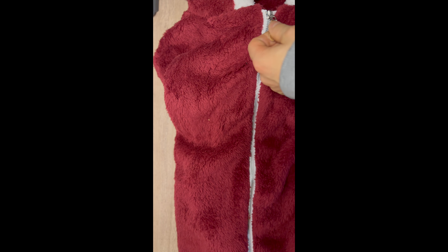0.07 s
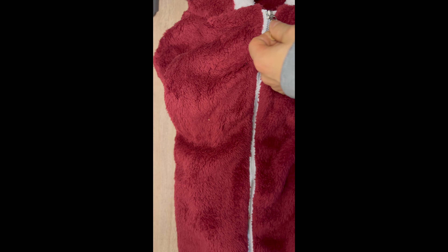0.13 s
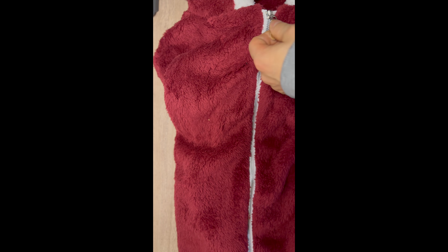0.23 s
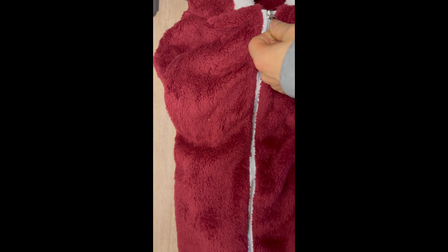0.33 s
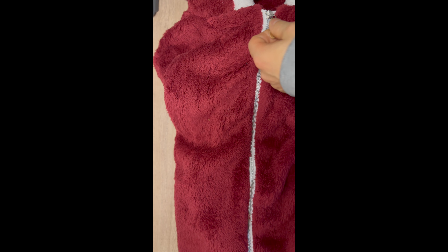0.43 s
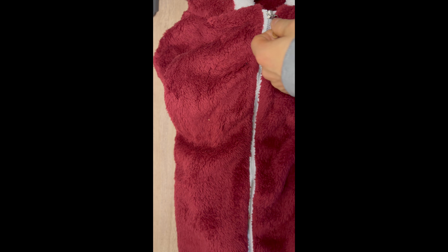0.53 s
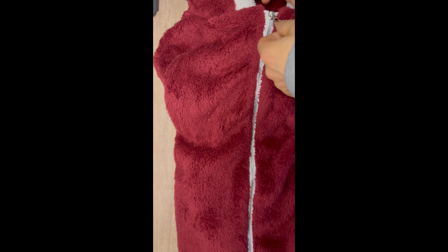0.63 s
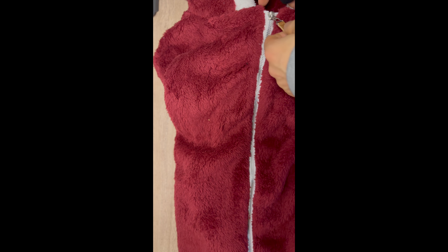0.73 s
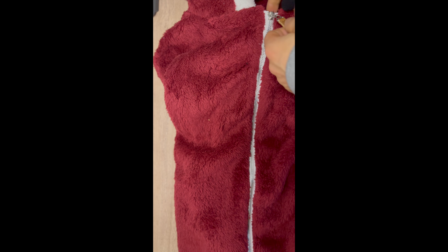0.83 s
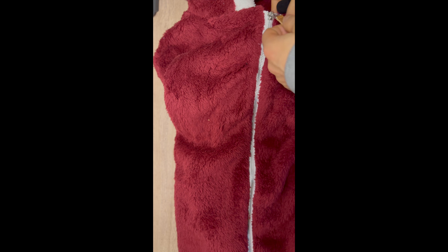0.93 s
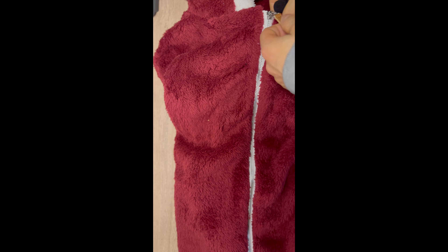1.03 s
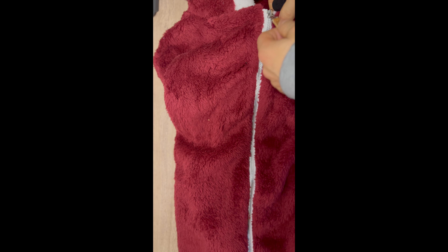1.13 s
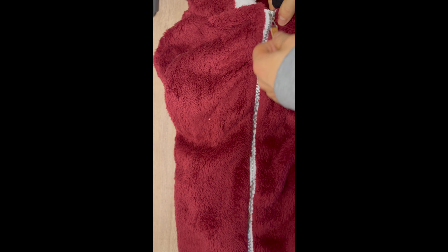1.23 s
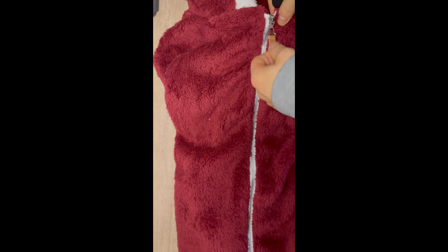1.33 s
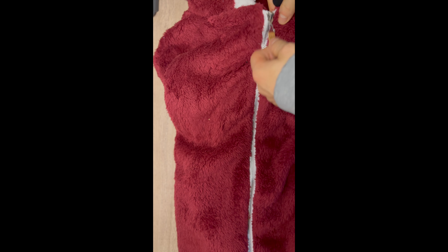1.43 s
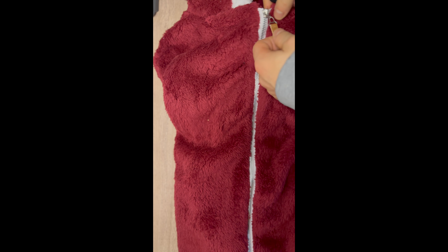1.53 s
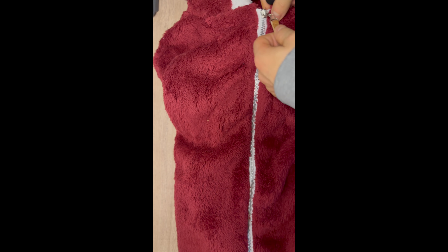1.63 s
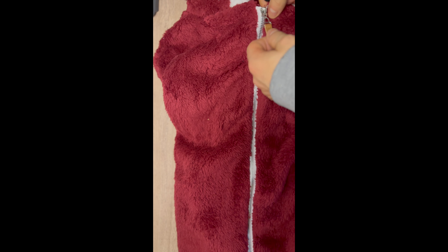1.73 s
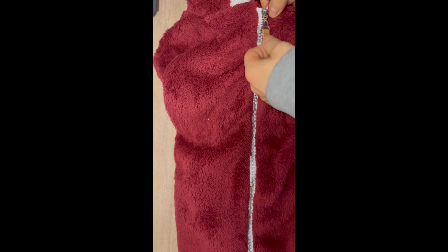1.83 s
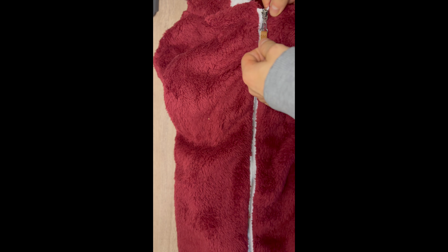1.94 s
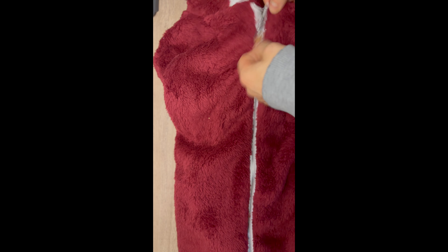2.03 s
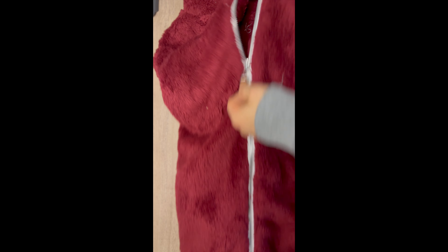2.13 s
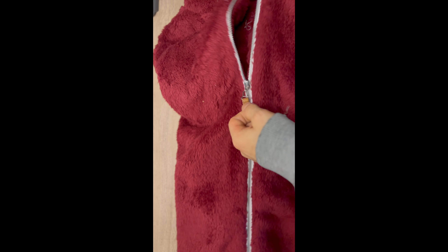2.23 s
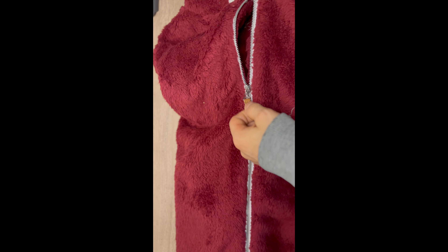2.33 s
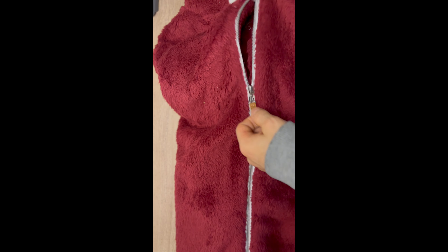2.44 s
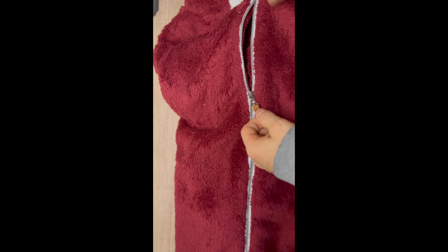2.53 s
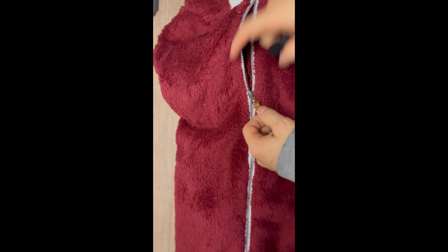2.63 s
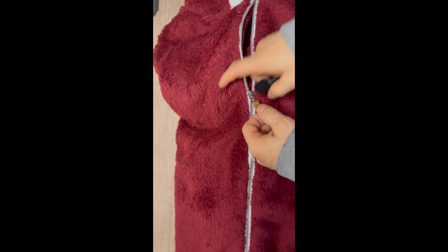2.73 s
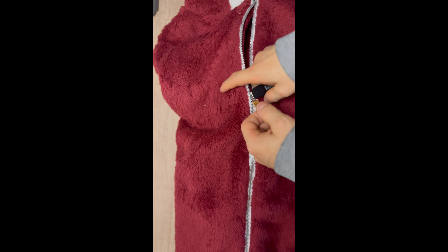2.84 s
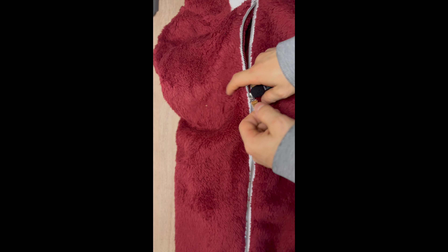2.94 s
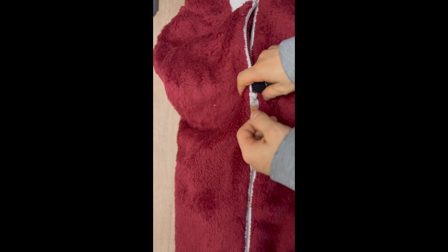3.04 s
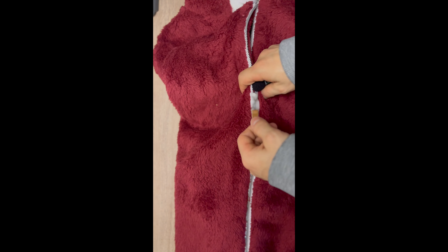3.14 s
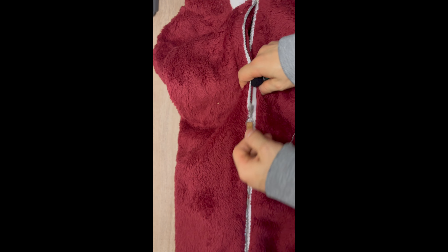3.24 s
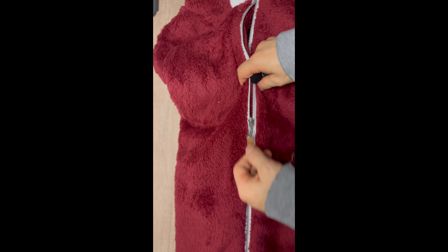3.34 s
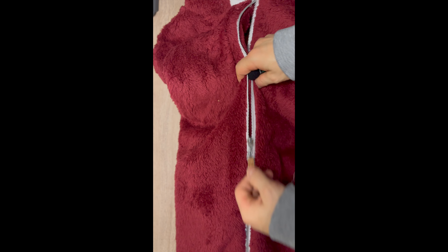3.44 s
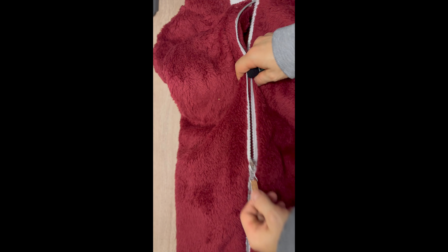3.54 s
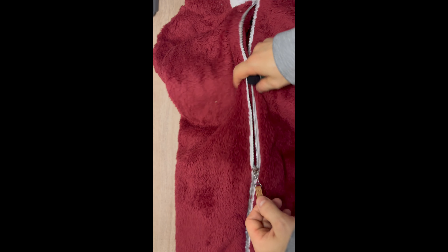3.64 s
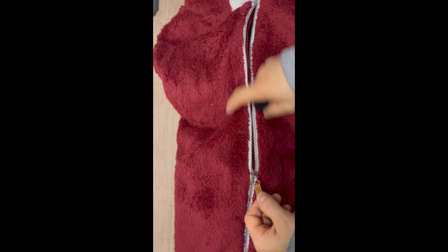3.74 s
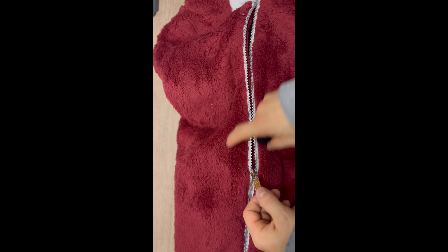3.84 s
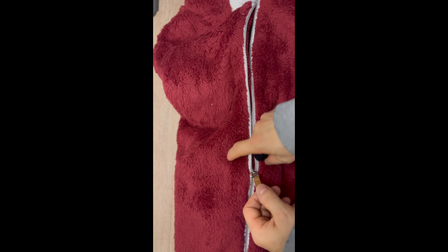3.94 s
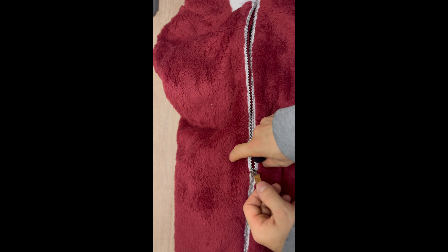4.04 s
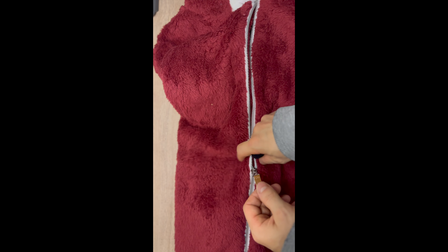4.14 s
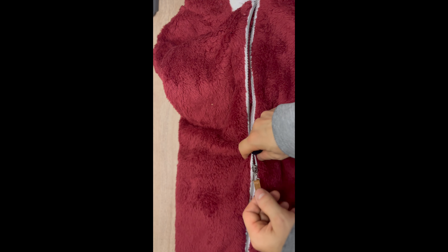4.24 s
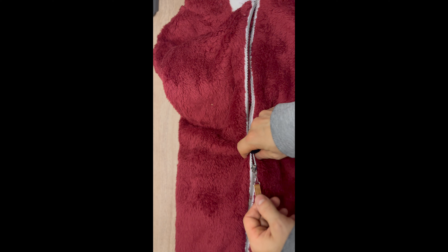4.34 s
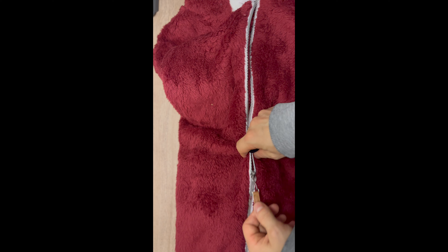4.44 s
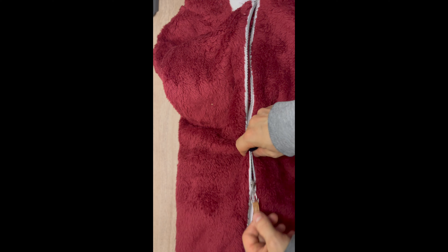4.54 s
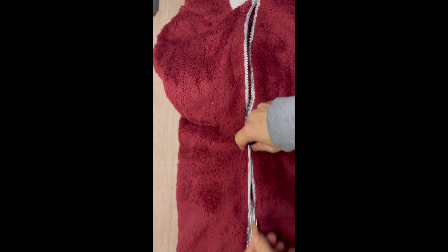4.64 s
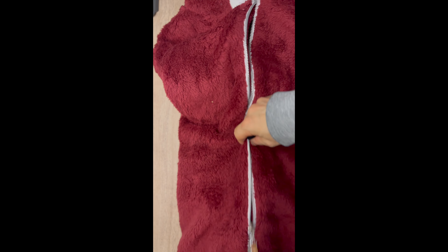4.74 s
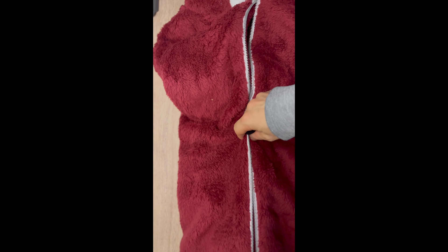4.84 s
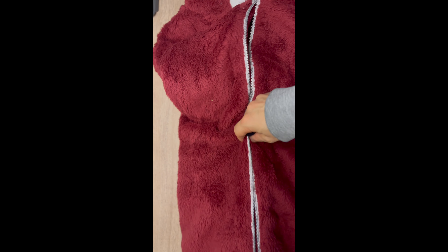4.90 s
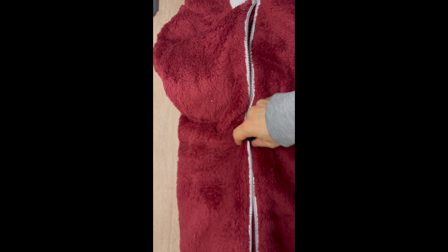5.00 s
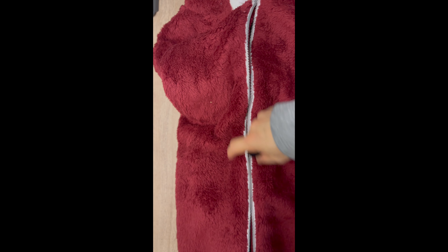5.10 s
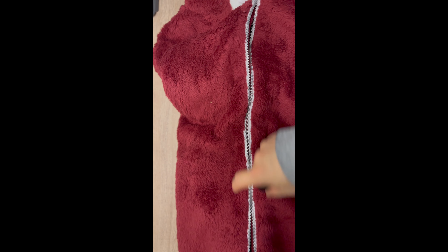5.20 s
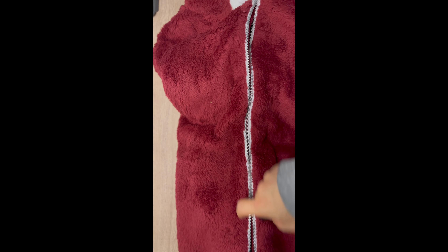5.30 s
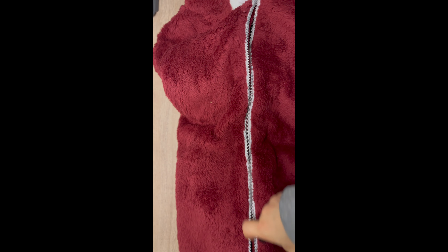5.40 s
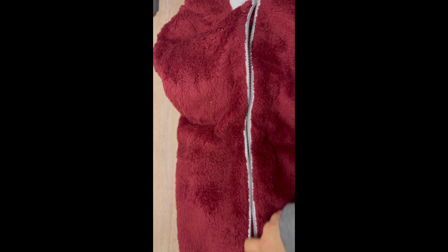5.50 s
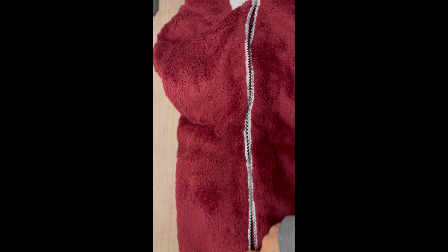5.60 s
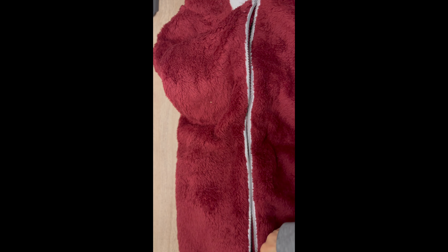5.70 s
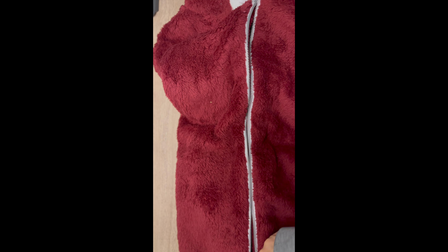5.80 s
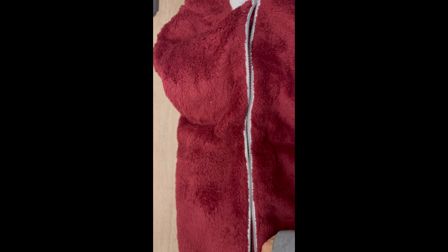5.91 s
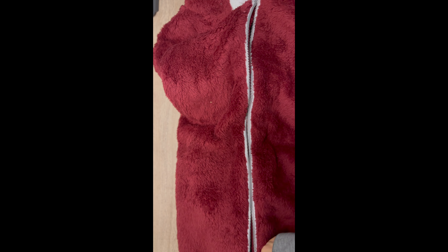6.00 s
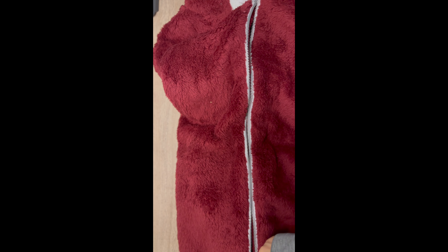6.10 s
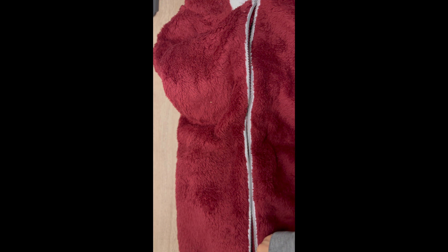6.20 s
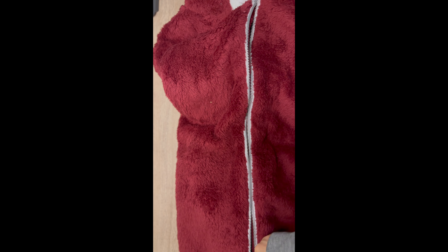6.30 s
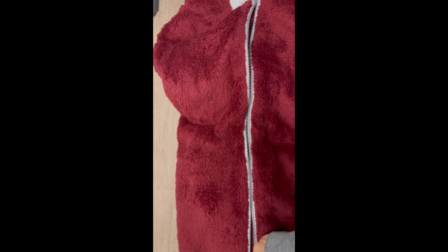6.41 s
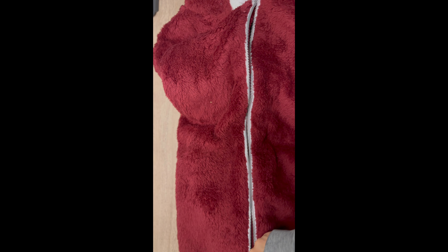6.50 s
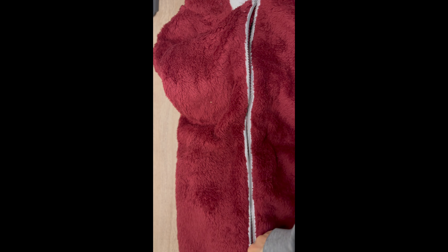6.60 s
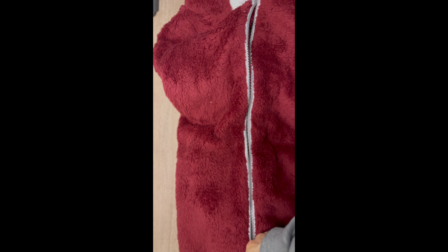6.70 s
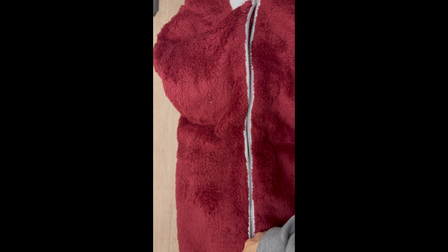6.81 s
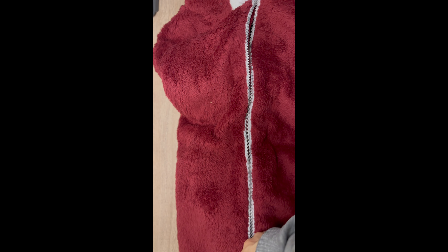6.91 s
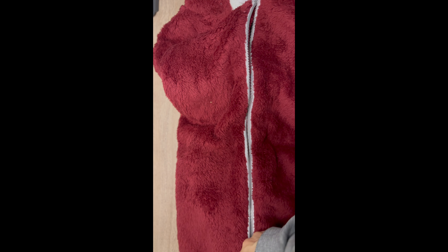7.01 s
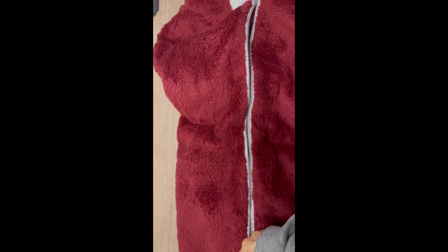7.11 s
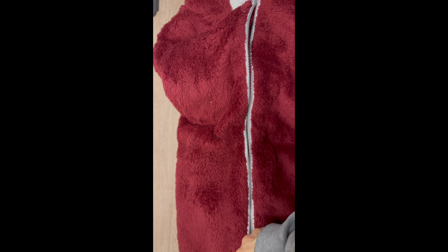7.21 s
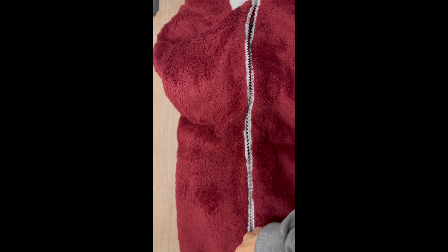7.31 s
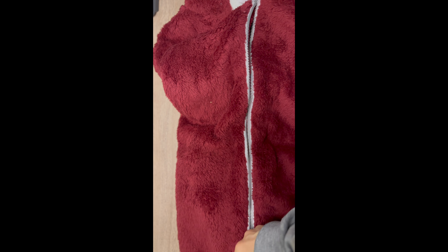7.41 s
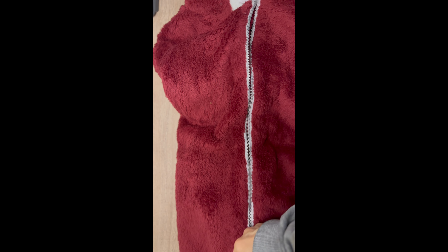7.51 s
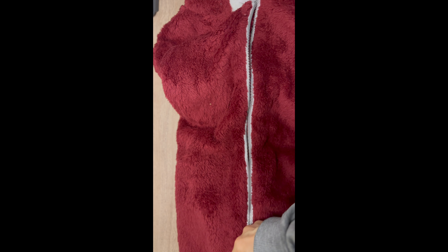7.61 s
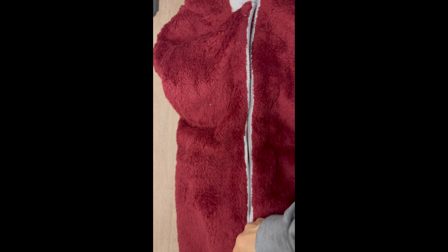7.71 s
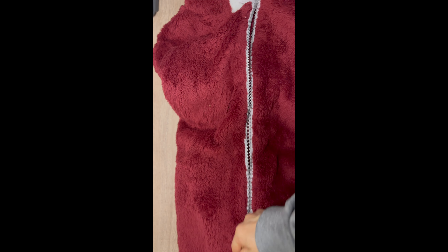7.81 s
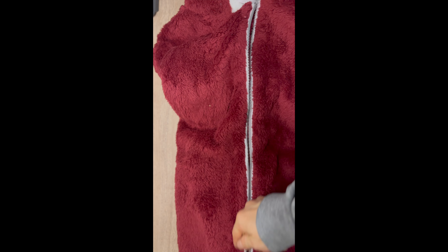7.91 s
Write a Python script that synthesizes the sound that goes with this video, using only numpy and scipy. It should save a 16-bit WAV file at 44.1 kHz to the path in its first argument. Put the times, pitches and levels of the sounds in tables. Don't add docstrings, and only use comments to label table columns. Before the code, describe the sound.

Hands brush and scuff plush fleece while a zipper buzzes down in short bursts, snapping and knocking, then begins a faint pull back.

```python
import sys
import numpy as np
from scipy import signal
from scipy.fft import rfft, irfft, next_fast_len
from scipy.io import wavfile
from scipy.ndimage import uniform_filter1d, map_coordinates

SR = 44100
rng = np.random.default_rng(int(sys.argv[2]) if len(sys.argv) > 2 else 0)


def generate_wav(signal):
    frames = np.transpose(np.atleast_2d(signal))
    scaled = np.clip(frames, -1, 1) * 32767
    pcm = np.round(scaled).astype(np.int16)
    wavfile.write(sys.argv[1], SR, pcm)


def amplitude_ratio(level_db):
    exponent = np.asarray(level_db, float) / 20
    return 10 ** exponent


N = 350683


def unit(x):
    return x / np.sqrt(np.mean(x ** 2) + 1e-20)


def steady(x):
    return x / np.sqrt(np.abs(uniform_filter1d(x ** 2, size=2000)) + 1e-9)


def curves(rows):
    s, *columns = np.transpose(rows)
    return [np.interp(np.arange(N) / SR, s, column) for column in columns]


def wobble(rate):
    knots = rng.standard_normal(int(N * rate / SR) + 4)
    return map_coordinates(knots, [np.arange(N) * rate / SR])


def filtered(x, response):
    m = next_fast_len(N + SR // 2)
    return irfft(rfft(x, m) * response(np.fft.rfftfreq(m, 1 / SR)), m)[:N]


def hiss(spectrum):
    f, level = np.transpose(spectrum)
    colour = lambda hz: amplitude_ratio(np.interp(np.log(hz + 1), np.log(f), level))
    return unit(filtered(rng.standard_normal(N), colour))


def patchy(spectrum, patchy_db):
    z = signal.stft(hiss(spectrum), nperseg=512)[2]
    field = uniform_filter1d(rng.standard_normal(z.shape), size=6, axis=0)
    field = uniform_filter1d(field, size=24, axis=1)
    return signal.istft(z * amplitude_ratio(patchy_db * unit(field)), nperseg=512)[1][:N]


def resonant(x, modes):
    def response(f):
        return sum((-1) ** k * amplitude_ratio(db) * 1j * f * width / (centre ** 2 - f * f + 1j * f * width)
                   for k, (centre, width, db) in enumerate(modes))
    return filtered(x, response)


# (start [s], hold [s], level [dB], brightness [dB], weight on capsule [dB])
SLOW_BRUSHES = [(0, 0.041, -35.5, 5, -2), (.83, .04, -50.5, 5, 9), (.47, 0.046, -42.5, 4, 9),
                (.68, 0.023, -49.5, 5, 20), (.89, 0.043, -36.5, 5, 4.5), (1.0, 0.16, -39, 3.5, 3),
                (1.1, 0.045, -49, -5.5, 26), (1.28, 0.55, -46, 1.5, 10.5), (1.74, 0.02, -52.5, 9, -9),
                (2.13, 0.085, -31.5, 9.5, 6), (2.31, 0.056, -42, -4.5, 1), (2.63, 0.068, -41, 1.5, -1),
                (2.79, 0.18, -51.5, 0, -14), (2.95, 0.15, -39, -3, 5), (3.115, 0.037, -29.5, -1, 0.5),
                (3.25, 0.36, -26.5, -0.5, 5.5), (4.11, 0.12, -45, -3, 19), (4.23, .2, -43, -7, 0),
                (4.6, 0.21, -26.5, -5, 4.5), (5.0, 0.1, -39.5, -2.5, -18), (6.05, 0.18, -31.5, -2.5, 1.5),
                (6.31, 0.12, -39.5, 0.5, -3.5), (6.52, 0.075, -37, 4.5, -21), (6.88, 0.033, -45, -9.5, -2)]
QUICK_SCUFFS = [(.225, 0.014, -48, 7.5, 14.5), (.298, 0.0077, -34.5, 15.5, 11), (.36, 0.081, -27, 9.5, 7),
                (1.79, 0.022, -34, -10.5, -8), (1.927, 0.014, -34.5, 0.5, 0), (1.988, 0.012, -35.5, -5, -3),
                (2.111, 0.025, -25, 11.5, 14.5), (2.49, 0.057, -34, 0.5, -1),
                (2.872, 0.065, -34.5, 3.5, 15), (3.7, 0.063, -28, -5.5, -15), (3.865, 0.048, -47, -10, 8),
                (4.0, 0.092, -57, -8, 35), (4.45, 0.22, -24, -1.5, 5.5), (5.2, 0.042, -48, -2.5, 11),
                (5.37, 0.051, -43, 9, 10.5), (5.43, 0.054, -36, 15, 14), (5.5, 0.037, -38, 2, 10),
                (5.62, 0.018, -37.5, 4.5, 13), (5.805, 0.029, -34.5, 7, 12),
                (5.875, 0.0081, -21.5, 7, -1.5), (5.92, 0.063, -26.5, -3.5, 5.5), (.333, .022, -40, 8, 8),
                (.128, 0.029, -40.5, 0.5, -10), (7.57, 0.062, -33.5, 2, -4), (7.72, .25, -32.5, 1, 16.5)]
SWELLING_DRAGS = [(1.59, 0.074, -37, 2.5, -2), (0.623, 0.013, -43, 3.5, 9.5), (1.26, 0.019, -48.5, 6, 12),
                  (0.755, 0.038, -60, -5, 32.5), (2.42, 0.081, -58, -2, 1), (4.3, 0.034, -36.5, 0.5, 20),
                  (5.1, 0.025, -44.5, -39.5, 2), (5.29, 0.049, -52.5, -4.5, 3),
                  (6.11, 0.028, -35, -23, 11.5), (6.64, 0.047, -51, 4, -2), (6.8, 0.062, -60, 6.5, 8),
                  (7.03, 0.081, -35, -2, -4), (7.49, 0.04, -59.5, 12, 7), (4.7, 0.047, -42, -16, 14)]
HANDS_AT_REST = [-70.5, -72, -63, -55]


def hands():
    time = np.arange(0, N, 32) / SR
    fuzz_rest_db = -100
    power = amplitude_ratio(2 * np.array([*HANDS_AT_REST, fuzz_rest_db]))[:, None]
    kinds = (SLOW_BRUSHES, 630, 320), (QUICK_SCUFFS, 3300, 1440), (SWELLING_DRAGS, 580, 960)
    for moves, rise, fall in kinds:
        s, hold, db, bright, weight = np.transpose(moves)[..., None]
        edge_db = -rise * np.maximum(s - time, 0) - fall * np.maximum(time - s - hold, 0)
        cloth_db = -3 + 0.4 * weight - 0.54 * bright + edge_db
        thump_db = weight + 0.62 * edge_db
        fuzz_db = -14.5 + 1.46 * bright + edge_db
        layers = [bright + edge_db, edge_db, cloth_db, thump_db, fuzz_db]
        power = power + amplitude_ratio(2 * (db + np.array(layers))).sum(axis=1)
    return [np.interp(np.arange(N) / SR, time, 10 * np.log10(p)) for p in power]


# (frequency [Hz], level [dB per Hz])
PILE_COLOUR = [(1470, -51), (2500, -25), (3460, -4.5), (5270, -11.5), (7650, -6), (8530, -18.5),
               (10200, -31.5), (16000, -79)]
WEAVE_COLOUR = [(550, -21.5), (850, 3.5), (1300, 1), (1790, 3.5), (2300, -0.5), (3000, -3.5), (4500, -40),
                (9000, -86)]
CLOTH_COLOUR = [(100, -10), (200, 2.5), (400, -8), (650, -12), (1100, -45), (3000, -100)]
THUMP_COLOUR = [(15, -19), (30, 10), (70, 7), (150, -3), (300, -48), (1200, -110)]
FUZZ_COLOUR = [(7000, -36.5), (9400, 2.5), (11500, -11), (14500, -10), (16000, -23.5)]


def fleece():
    hiss_db, scrape_db, cloth_db, thump_db, fuzz_db = hands()
    catch = 1.4 * wobble(35) + 3.3 * wobble(160) + 2.82 * wobble(900)
    low = amplitude_ratio(cloth_db + 4.5) * unit(amplitude_ratio(0.88 * catch + 5.7 * wobble(40)) * hiss(CLOTH_COLOUR))
    tears = (rng.random(N) < 45 / SR) * rng.exponential(size=N)
    catch = catch + 5 * np.minimum(signal.lfilter([1], [1, -.99], tears), 2)
    tips = amplitude_ratio(fuzz_db) * unit(amplitude_ratio(catch) * patchy(FUZZ_COLOUR, patchy_db=4.5))
    top = amplitude_ratio(hiss_db - 3.5) * unit(amplitude_ratio(catch) * patchy(PILE_COLOUR, patchy_db=3))
    middle = amplitude_ratio(scrape_db - 0.98) * unit(amplitude_ratio(0.93 * catch) * patchy(WEAVE_COLOUR, patchy_db=4.5))
    thump = amplitude_ratio(thump_db + 1.0) * unit(amplitude_ratio(5.5 * wobble(15)) * hiss(THUMP_COLOUR))
    quiet = amplitude_ratio(-16 * uniform_filter1d(pulling(), size=400))
    return quiet * (middle + low) + quiet ** 0.25 * (top + tips) + np.sqrt(quiet) * thump


# (time [s], crack [dB], push [dB], push pitch [Hz])
NAIL_CRACKLES = [(0.3031, -7, -3, 68.5), (0.3277, -1, 0.5, 76.8), (0.3592, -7.5, -3, 201),
                 (0.3808, -11.5, -10, 88.5), (.393, -13, -5.5, 67), (.425, -14.5, -12, 137),
                 (1.4606, -23, -42, 80), (2.376, -31, -34, 181), (2.6782, -14.5, -10.5, 247),
                 (2.732, -31, -63, 150), (2.8836, -12.5, -12.5, 70), (3.2152, -20.5, -18.5, 74.83),
                 (4.988, -26, -53, 101.9), (4.997, -21.5, -48, 60.6), (5.2085, -27.5, -23, 167),
                 (5.431, -13.5, -21.5, 79), (5.4478, -16, -12.5, 189), (5.4613, -12, -15, 109),
                 (5.482, -19, -13, 192), (5.8064, -13, -22, 56.6), (5.832, -14, -10, 47.22),
                 (5.8861, -13.5, -6.5, 222), (5.924, -19, -17, 64), (5.95, -12.5, -34, 283),
                 (6.325, -24, -25.5, 312), (6.401, -25.5, -22.5, 425), (7.475, -30.5, -24, 201),
                 (7.57, -26, -43, 200.4), (7.6016, -34, -24, 261), (7.6184, -25.5, -20, 183),
                 (0.3629, -11.5, -6, 257), (.367, -13.5, -8, 240), (0.3716, -15.5, -16, 220),
                 (.39, -15, -20, 150), (0.429, -20, -18, 200), (.435, -21, -16, 200)]
# (time [s], slap [dB], push [dB], push pitch [Hz])
FORCED_TEETH = [(1.4969, -14.5, -17, 134), (1.7928, -12, -12, 120), (1.889, -19.5, -19.5, 111),
                (1.9366, -13, -7.5, 300), (1.927, -25, -16.5, 200), (2.105, -15.5, -9.5, 330),
                (1.9878, -17.5, -17.5, 148), (2.06, -20, -19, 248.4), (2.1119, 2, -3.5, 87),
                (2.1225, -3.5, -1.5, 62.1), (3.0249, -17.5, -21, 238), (3.253, -1, -6, 177),
                (4.1175, -22, -18, 120), (4.2797, -20.5, -17.5, 75), (4.468, -14.5, -14, 150),
                (1.998, -25.5, -25, 150), (4.452, -7, -4, 113.5), (4.4801, -3.5, 2.5, 243.5),
                (4.5038, 3, 5, 74.6), (4.52, -1, -1.5, 150), (4.5337, -2.5, 1, 213.6), (4.557, 0, 1, 200),
                (4.549, -12, -2, 170), (4.574, -6.5, -1.5, 224), (4.59, -8, 3, 209),
                (4.6001, -1.5, 1.5, 163.3), (5.8576, -24, -40.5, 52.2), (5.876, -12, -7, 130),
                (5.9144, -20, -16, 129.6), (5.94, -11.5, -11, 266)]
# (time [s], push [dB], push pitch [Hz])
CAPSULE_NUDGES = [(.924, -17, 150), (1.304, -21.5, 127), (1.322, -20.5, 156), (1.4, -18.5, 130),
                  (1.417, -18, 134), (1.429, -17.5, 108.6), (3.201, -13, 102.5), (3.8707, -20, 223),
                  (4.1006, -17.5, 49.7), (4.1518, -21.5, 193), (4.3254, -17, 140), (4.315, -19, 120),
                  (4.93, -19, 62), (4.948, -22, 60), (3.506, -5, 95), (5.968, -21.5, 150)]
# (time [s], peak [dB])
FIBRE_TICKS = [(3.8348, -33.5), (3.8845, -26.5), (4.0741, -38), (4.2016, -24), (4.2195, -20.5),
               (4.2968, -24.5), (4.3149, -20), (4.361, -28), (5.19, -21.5), (5.7346, -32.5), (5.7548, -49),
               (6.3579, -23), (6.3839, -36), (6.412, -22), (6.8945, -21.5), (7.1563, -33), (7.1748, -35),
               (7.2046, -37), (7.2435, -40), (7.327, -39.5), (7.402, -43), (7.5044, -40), (7.516, -44),
               (6.965, -38), (6.981, -43), (6.998, -40), (6.163, -18), (1.787, -20), (2.861, -20),
               (2.868, -15), (3.013, -19.5), (.64, -33)]
# (time [s], peak [dB], push over it [dB], push pitch [Hz])
TAPE_SLIPS = [(0.657, -36, -3, 230), (0.976, -26, -2, 230), (1.806, -22.5, -4.5, 233.5),
              (2.138, -0.5, -1, 231), (2.903, -12.5, -1, 230), (2.927, -26, -3, 230), (2.945, -28, 1, 230),
              (2.979, -35, -6, 228), (3.054, -13, -5, 230), (3.066, -11.5, 1.5, 230),
              (3.096, -14, -1.5, 230), (3.11, -6, -1.5, 230), (3.133, -11, 5, 230), (3.151, -13.5, 3, 230),
              (3.207, -11.5, -2.5, 230), (3.261, 4, -4, 230), (3.626, -4, 1, 230.5), (3.634, -12, -1, 230),
              (3.648, -7, -10, 230), (4.253, -26, -3, 230), (4.284, -12.5, 5, 230), (4.377, -10, 1, 230),
              (4.391, -10.5, 5, 230), (4.41, -11.5, 0, 230), (4.612, 0.5, -3.5, 230.6),
              (4.622, -0.5, -5, 233), (4.633, -3, -4, 230), (4.646, 3, -7.5, 230), (4.925, -14.5, 2, 230),
              (4.953, -19.5, -6, 230), (5.991, -13, -6, 230), (6.034, -13, -6, 230), (6.057, -16, -6, 230),
              (6.183, -9.5, -1, 230), (7.719, -29, -3, 230), (7.726, -22.5, -3, 230), (7.742, -9, -5, 230),
              (7.784, -9.5, -3, 230), (7.807, -11, -4, 230)]


def contacts():
    nails = [(s, db, push, hz, db - 9) for s, db, push, hz in NAIL_CRACKLES]
    teeth = [(s, slap - 11.5, push, hz, slap) for s, slap, push, hz in FORCED_TEETH]
    nudges = [(s, push - 13.5, push, hz, push - 24) for s, push, hz in CAPSULE_NUDGES]
    ticks = [(s, db - 8, db - 10, 120, db - 10.5) for s, db in FIBRE_TICKS]
    slips = [(s, db - 23, db + push - 7, hz, db - 14) for s, db, push, hz in TAPE_SLIPS]
    return teeth + nails + nudges + ticks + slips


# (frequency [Hz], level [dB per Hz])
CRACK_COLOUR = [(500, -20.5), (1500, -6), (2200, 6), (4800, -1.5), (7600, -6), (11000, -15), (16000, -44)]
SLAP_COLOUR = [(250, -15.5), (500, 9), (1200, 3), (1700, 0), (3000, -51)]


def snaps():
    lead = SR // 100
    out = np.zeros(N + SR)
    t = np.arange(-lead, SR // 12) / SR
    after = np.maximum(t, 0)
    dry = np.pad(hiss(CRACK_COLOUR), (0, SR))
    slap = np.pad(hiss(SLAP_COLOUR), (0, SR))
    ring = 0.22 * np.sin(2 * np.pi * 1200 * after) * amplitude_ratio(-60 * after / 0.034)
    events = contacts()
    chance = rng.standard_normal((len(events), 2))
    for (s, db, push_db, push_hz, slap_db), (side, long) in zip(events, chance):
        start = round(s * SR) - lead
        now = slice(start, start + len(t))
        t60 = 0.011 * amplitude_ratio(0.17 * (max(db, slap_db) + 24.5) + 1.6 * long)
        burst = np.where(t < 0, 0.047 * np.exp(t / 0.00063), amplitude_ratio(-60 * after / t60))
        burst = uniform_filter1d(burst, size=14)
        build = -.6 * np.exp(t * push_hz * 1.9) * (1 + t * SR / lead)
        release = np.cos(2 * np.pi * push_hz * t - .6) * amplitude_ratio(-60 * after * push_hz / 3.7)
        strain = uniform_filter1d(np.where(t < 0, build, release), size=24)
        push = np.sign(side) * uniform_filter1d(strain, size=10)
        crack = burst * uniform_filter1d(dry[now], size=1 + int(db < -22) + int(db < -30))
        out[now] += amplitude_ratio(db + 3.5) * crack + amplitude_ratio(push_db + 4.5) * push
        out[now] += amplitude_ratio(slap_db + 4.5) * (burst * slap[now] + ring)
    return out[:N]


# (frequency [Hz], level [dB per Hz])
CUFF_COLOUR = [(290, -38), (500, -8), (1800, -5), (2230, -6.5), (3480, 0), (5280, -10), (7670, -12),
               (15500, -46.5)]
# (start [s], hold [s], level [dB])
CUFF_STROKES = [
    (7.015, 0.037, -34),
    (7.068, .034, -21),
    (6.875, 0.01193, -43),
    (6.915, 0.031, -44),
    (.622, 0.017, -39),
]
# (frequency [Hz], level [dB per Hz])
SKIN_COLOUR = [(900, -42), (1150, -1.5), (1600, -2), (2050, 0), (2350, -29), (4000, -68.5)]
# (start [s], hold [s], level [dB])
SKIN_STROKES = [
    (.49, 0.048, -44.5),
    (.585, .04, -57),
    (.89, 0.073, -43),
    (1.0, 0.078, -35.5),
    (1.07, .13, -46.5),
    (2.62, 0.072, -41.5),
    (2.78, .06, -52),
    (5.16, 0.1, -58),
]


def rubs():
    time, out = np.arange(N) / SR, 0
    rise, fall = 670, 1750
    for colour, strokes in (CUFF_COLOUR, CUFF_STROKES), (SKIN_COLOUR, SKIN_STROKES):
        level = sum(amplitude_ratio(db - rise * np.maximum(s - time, 0) - fall * np.maximum(time - s - hold, 0))
                    for s, hold, db in strokes)
        grain = amplitude_ratio(2.5 * wobble(200) + 1.8 * wobble(800))
        out = out + level * unit(grain * hiss(colour))
    return out


# (time [s], tooth pairs [1/s], effort [dB])
FAST_PULL = [(2.125, 410, -15.5), (2.138, 427, -16.5), (2.174, 518, -4.5), (2.198, 464, -5),
             (2.224, 434, -10.5), (2.23, 408, -12), (2.242, 340, -7.5), (2.258, 256, -12.5),
             (2.29, 135, -27.5)]
ROUGH_PULL = [(3.248, 125, -7.5), (3.29, 127.1, 1.5), (3.315, 150, 2.5), (3.345, 139.7, -2),
              (3.375, 114.6, -8.5), (3.398, 115, -8)]
RESUMED_PULL = [(3.399, 119.8, -3), (3.42, 115.1, -4), (3.443, 156, -5.5), (3.495, 155, -9.5),
                (3.512, 94.9, -7.5), (3.55, 174.8, -6), (3.604, 190.2, -10.5), (3.62, 129.9, -12),
                (3.645, 91, -24.5)]
SLOW_PULL = [(4.6, 71.84, -8.5), (4.65, 94.95, -7.5), (4.685, 204.6, -9), (4.72, 245.7, -13.5),
             (4.79, 290.1, -14), (4.855, 294.4, -16.5), (4.905, 220.2, -20), (4.925, 89.74, -28),
             (4.961, 61.68, -36.5)]
BACK_PULL = [
    (7.742, 82.72, -18.5),
    (7.831, 88.04, -20.5),
    (7.889, 123, -21.5),
    (7.955, 164.8, -20),
]
PULLS = FAST_PULL, ROUGH_PULL, RESUMED_PULL, SLOW_PULL, BACK_PULL


def pulling():
    time = np.arange(N) / SR
    return sum(np.clip(np.minimum(time - rows[0][0], rows[-1][0] - time) / 0.0053, 0, 1) for rows in PULLS)


# (second tooth size [ratio], its lag [turns], unevenness [0-1], tape tension [0-1], rattle [dB])
PULL_GAIT = [
    (0.6, 0.45, .07, .45, -13),
    (1, .36, .2, 0.37, -17),
    (.6, .38, .13, .52, -15),
    (0.2, 0.37, .1, 0.31, -13),
    (0.51, .35, .3, 0.2, -25.5),
]
RATTLE_FADE = [150, 5, 4.3, 17.8, 39]
ROCKING = [-2, -8.5, -5, -9, 1]
# (second over it [dB], third over it [dB])
ROCKING_OVERTONES = [
    [-29, -30],
    [-8, 3.5],
    [-4.5, -7],
    [2.5, 1],
    [0, -13],
]
# (frequency [Hz], width [Hz], level [dB])
SLACK_TAPE = [(150, 159, 6), (391, 170, 11.5), (756, 630, 1.5)]
TAUT_TAPE = [(453, 450, 15.5), (935, 620, 10), (1400, 330, -5), (2106, 520, -7.5)]
JACKET_BOOM = [(210, 70, 0.0013)]
BOOM_LEVEL = [-29.5, -15, -12, -6, -1]
# (frequency [Hz], level [dB per Hz])
RATTLE_COLOUR = [(600, -8), (1000, -4), (2100, -5), (3000, -13), (4200, -16), (7500, -27), (9000, -43.5),
                 (16000, -56)]
# (frequency [Hz], width [Hz], depth [0-1])
HAND_SHADOWS = [(1400, 220, 0.4), (4800, 330, 0.6)]
# (time [s], length [s])
SLIDER_STICKS = [(3.361, 0.0054), (3.399, 0.014), (3.418, 0.0035), (3.618, 0.0059), (4.619, 0.0059),
                 (7.781, .006), (7.805, .006), (7.863, .009), (4.634, .004)]


def zipper():
    rate, knock_db = curves(np.concatenate(PULLS))
    rate = rate * (1 + .035 * wobble(45))
    time = np.arange(N) / SR
    which = np.searchsorted([rows[-1][0] for rows in PULLS[:-1]], time)
    since = np.maximum(time - np.array([rows[0][0] for rows in PULLS])[which], 0)
    twin, lag, uneven, tension, rattle_db = np.transpose(PULL_GAIT)[:, which]
    tension = np.clip(tension + .0015 * (rate - 150), 0, 1)
    rattle_db = rattle_db + 0.6 * knock_db - np.array(RATTLE_FADE)[which] * since

    turns = np.cumsum(rate * (1 + .8 * uneven * wobble(120))) / SR
    size = amplitude_ratio(12 * uneven * rng.standard_normal((2, N)))
    left = np.diff(np.floor(turns), prepend=0) * size[0]
    right = np.diff(np.floor(turns - lag), prepend=-1) * size[1]
    teeth = left + twin * right
    soft = filtered(teeth, lambda hz: -1j / (1 + 1j * hz / 2000) ** 3)
    slack, taut = steady(resonant(soft, SLACK_TAPE)), steady(resonant(soft, TAUT_TAPE))
    knock = (1 - tension) * slack + tension * taut

    phase = 2 * np.pi * np.cumsum(rate) / SR
    levels_db = [0, *np.transpose(ROCKING_OVERTONES)[:, which]]
    rocking_db = np.array(ROCKING)[which]
    sway = sum(amplitude_ratio(rocking_db + db + 5 * wobble(40)) * np.sin((k + 1) * phase)
               for k, db in enumerate(levels_db))
    boom = amplitude_ratio(np.array(BOOM_LEVEL)[which]) * steady(resonant(soft, JACKET_BOOM))

    burst = 0.46 + signal.lfilter([.2], [1, -.975], np.abs(uniform_filter1d(teeth, size=9)) * 9)

    def shadow(f):
        return np.prod([1 - np.clip(deep, 0, 1) * np.exp(-((f - hz) / wide) ** 2)
                        for hz, wide, deep in HAND_SHADOWS], axis=0)
    rattle = steady(filtered(burst * hiss(RATTLE_COLOUR), shadow))
    free = np.prod([1 - 0.86 * np.exp(-((time - s) / (.5 * span)) ** 4) for s, span in SLIDER_STICKS], axis=0)
    body = amplitude_ratio(knock_db - 2.13) * (steady(knock) + sway + boom)
    return free * pulling() * (body + amplitude_ratio(rattle_db + 6) * rattle)


def scene():
    return (fleece() + snaps() + rubs() + zipper())[None]


def low_pass(x):
    return signal.sosfilt(signal.butter(12, 16370, fs=SR, output="sos"), x)


def record(dry):
    clipped = dry / (1 + np.abs(dry / .99) ** 16) ** (1 / 16)
    limited = filtered(clipped[0], lambda hz: 1 / (1 + (hz / 15900) ** 40))
    return low_pass(limited[None])


dry = scene()
out = record(dry)
generate_wav(out)
```